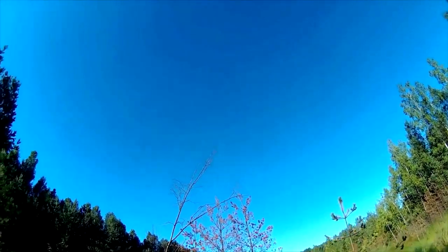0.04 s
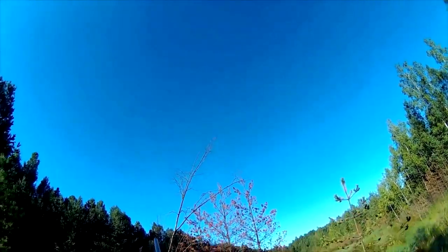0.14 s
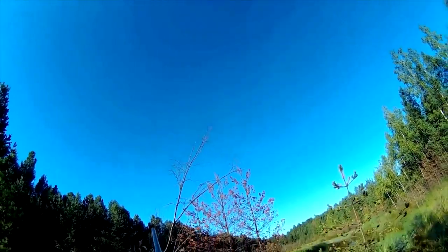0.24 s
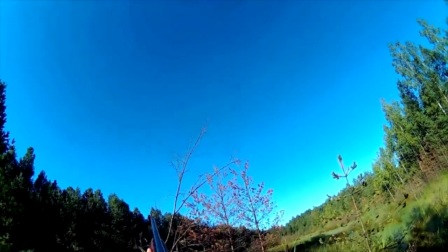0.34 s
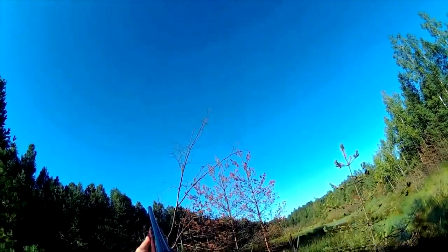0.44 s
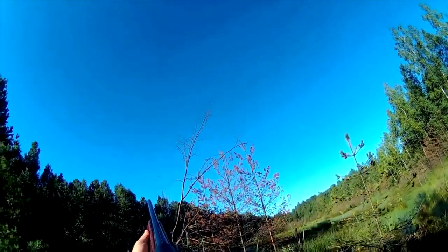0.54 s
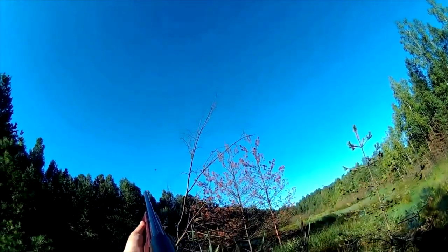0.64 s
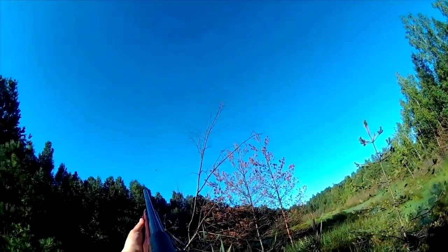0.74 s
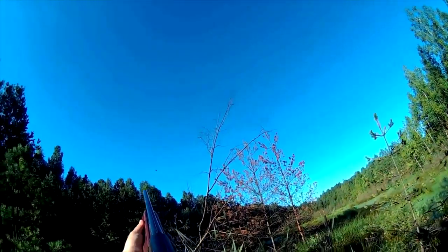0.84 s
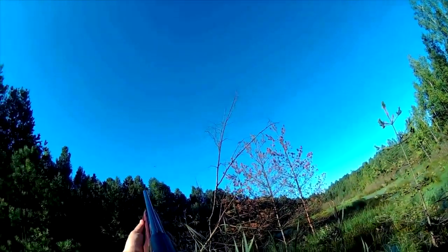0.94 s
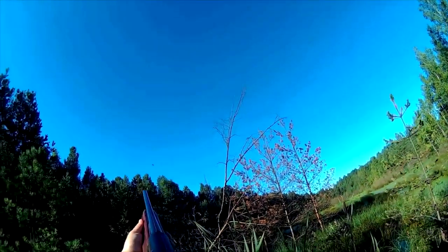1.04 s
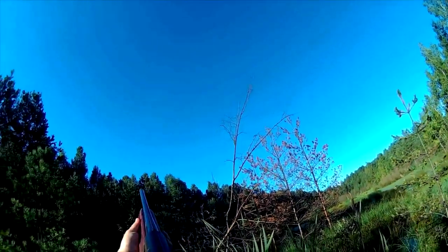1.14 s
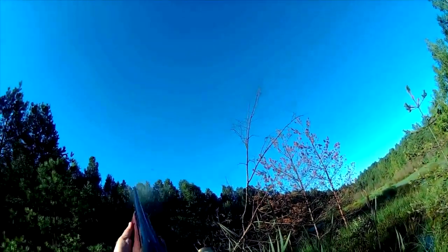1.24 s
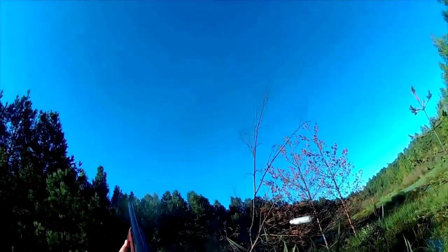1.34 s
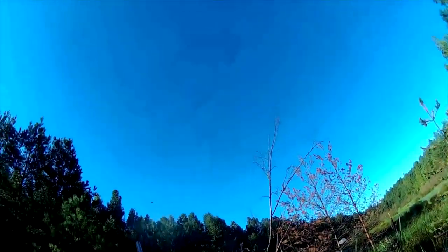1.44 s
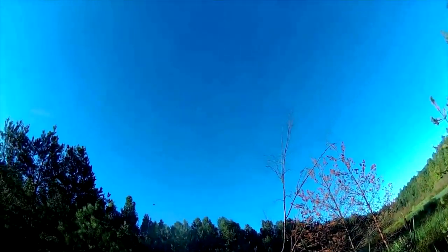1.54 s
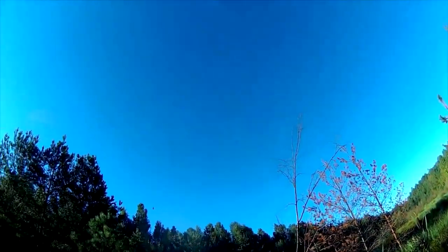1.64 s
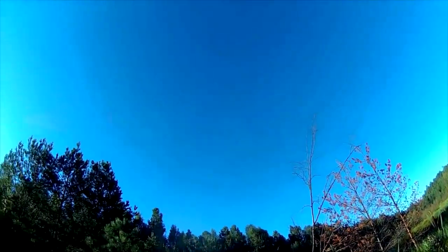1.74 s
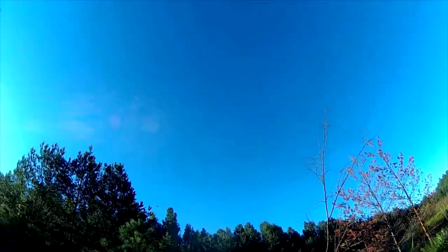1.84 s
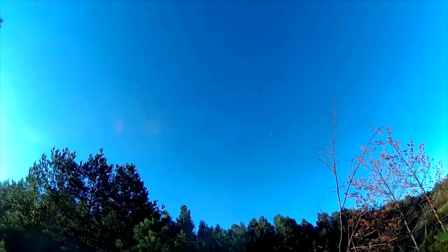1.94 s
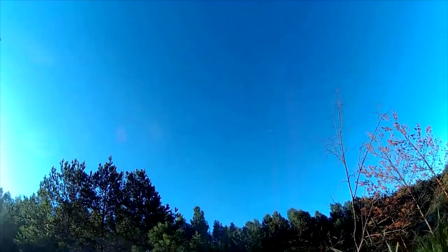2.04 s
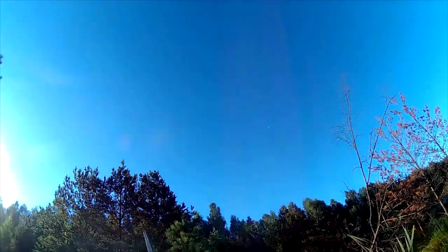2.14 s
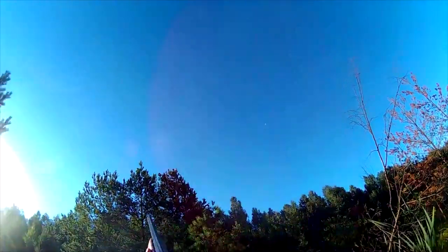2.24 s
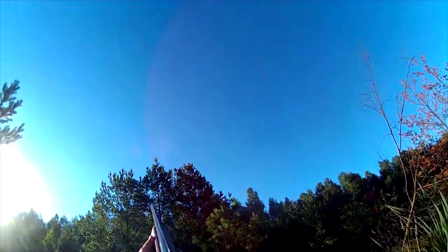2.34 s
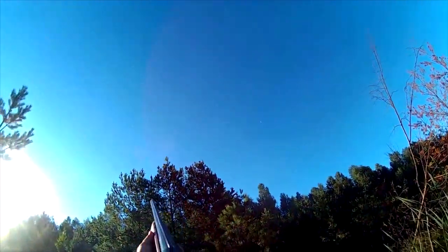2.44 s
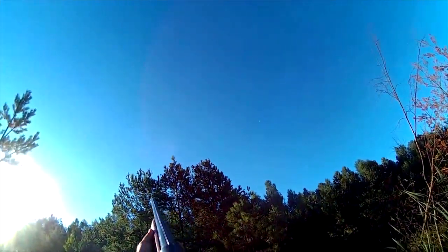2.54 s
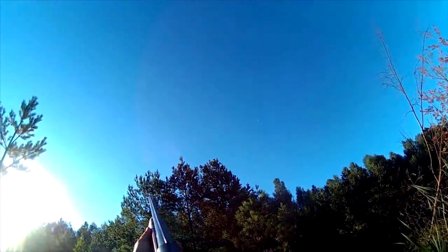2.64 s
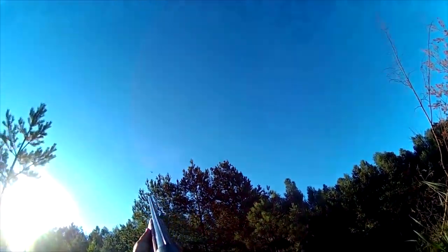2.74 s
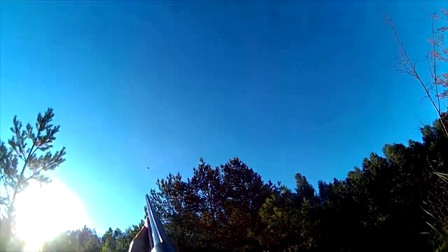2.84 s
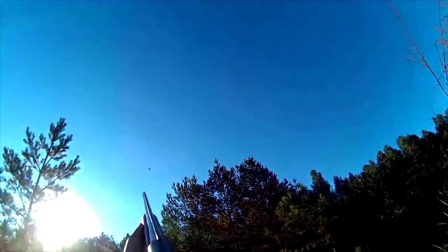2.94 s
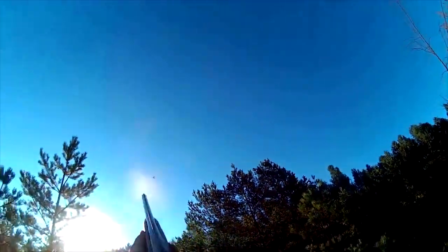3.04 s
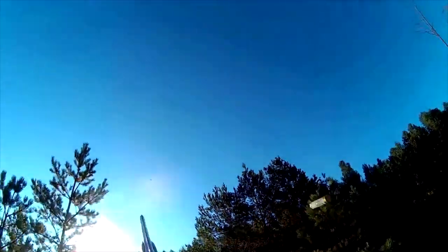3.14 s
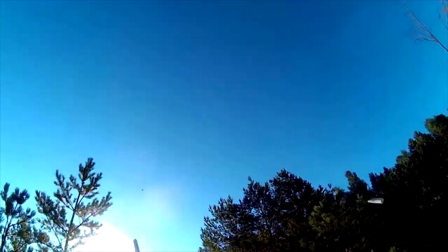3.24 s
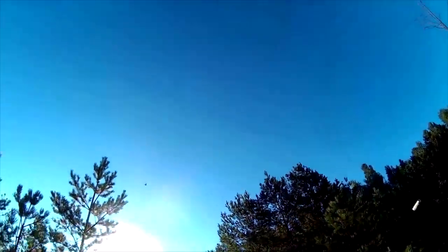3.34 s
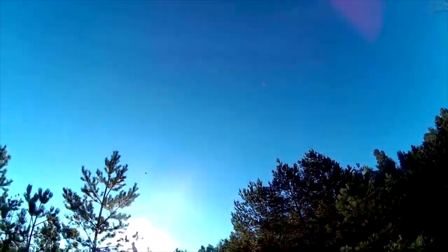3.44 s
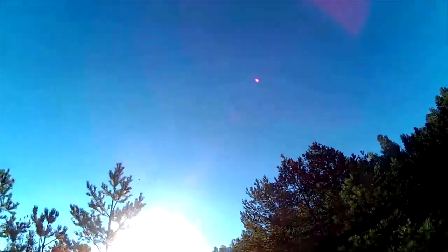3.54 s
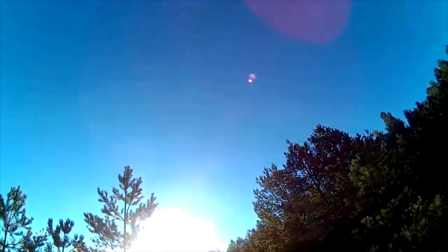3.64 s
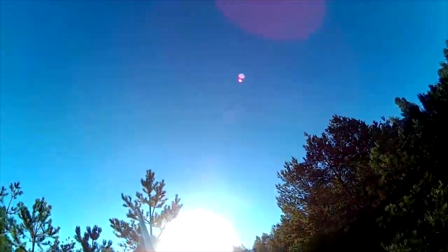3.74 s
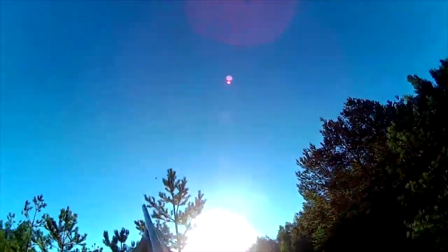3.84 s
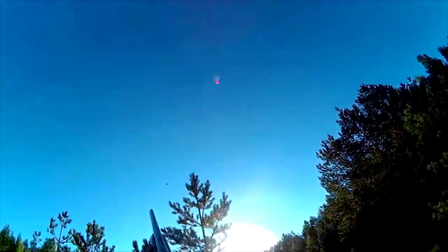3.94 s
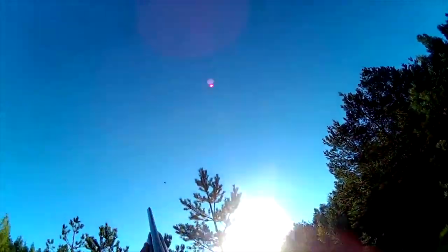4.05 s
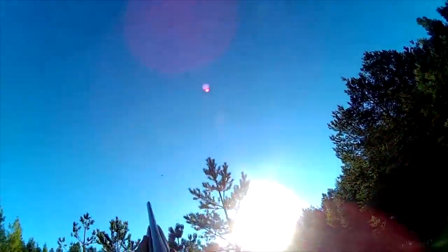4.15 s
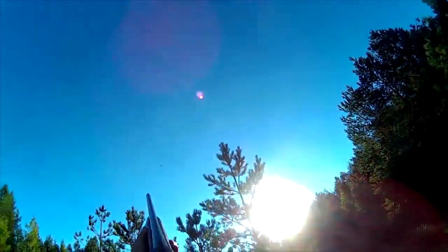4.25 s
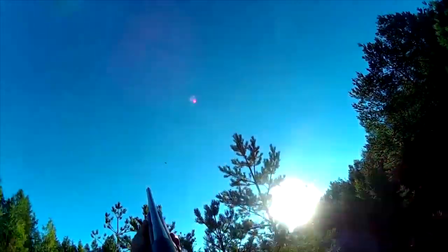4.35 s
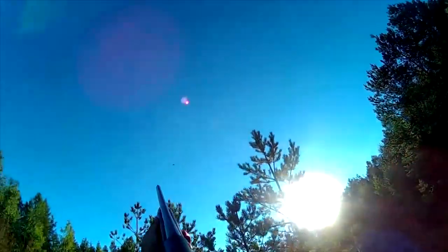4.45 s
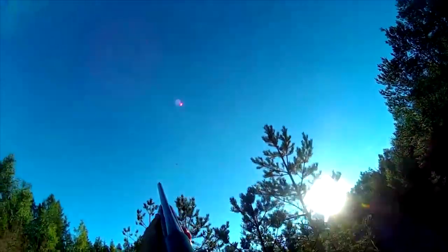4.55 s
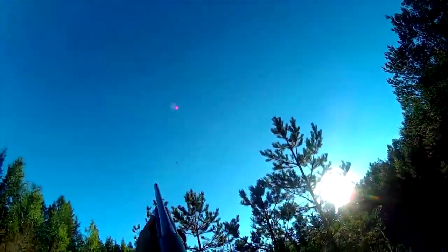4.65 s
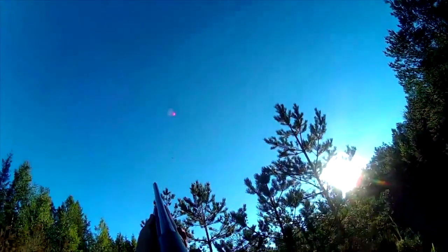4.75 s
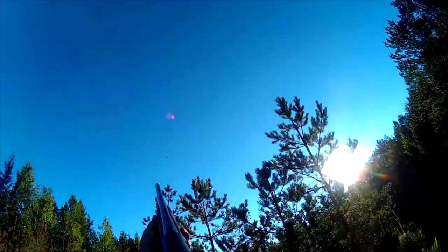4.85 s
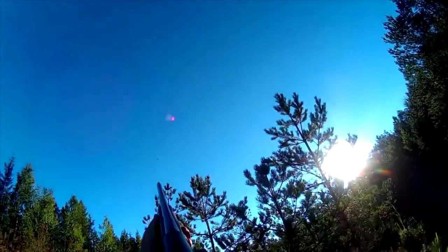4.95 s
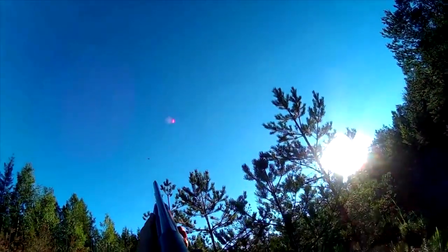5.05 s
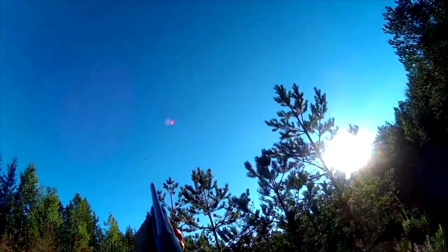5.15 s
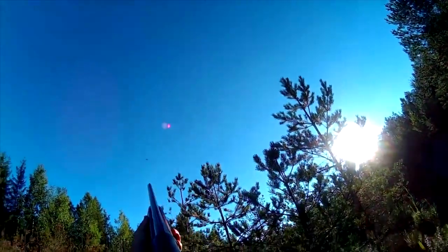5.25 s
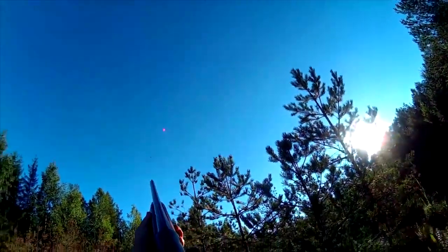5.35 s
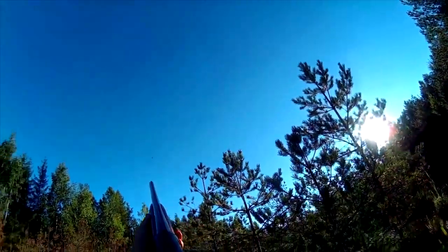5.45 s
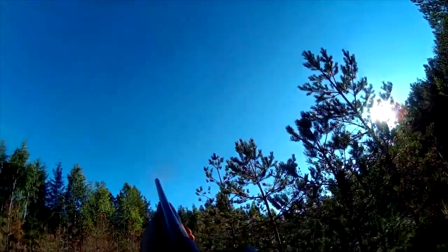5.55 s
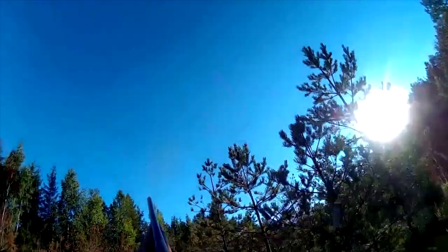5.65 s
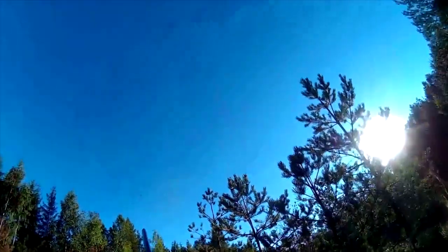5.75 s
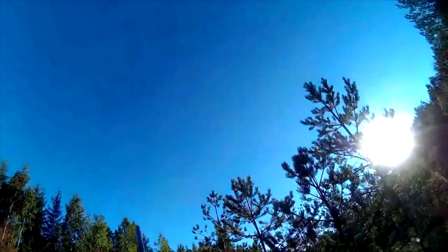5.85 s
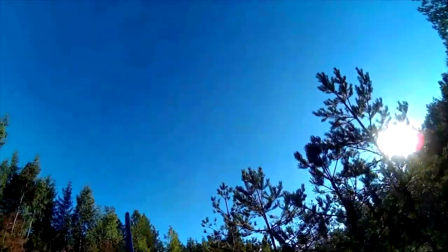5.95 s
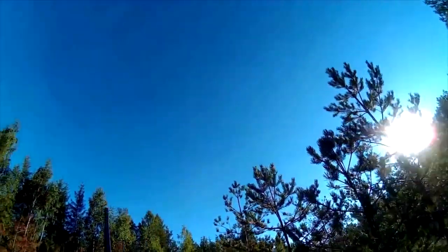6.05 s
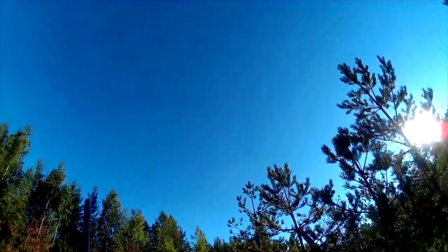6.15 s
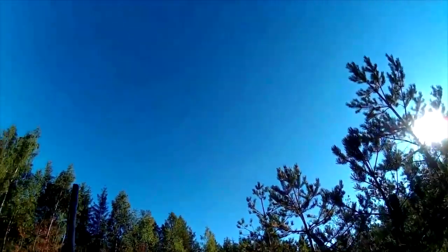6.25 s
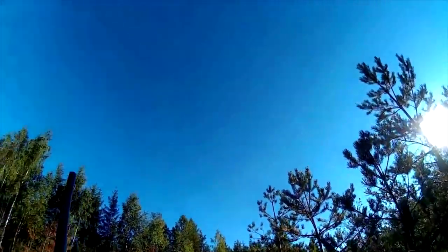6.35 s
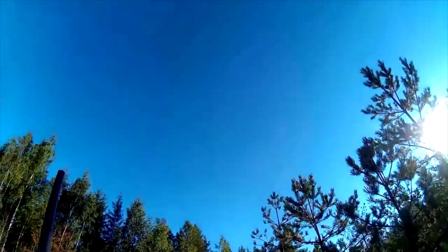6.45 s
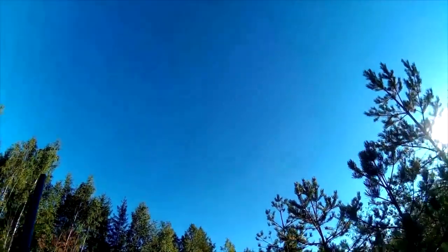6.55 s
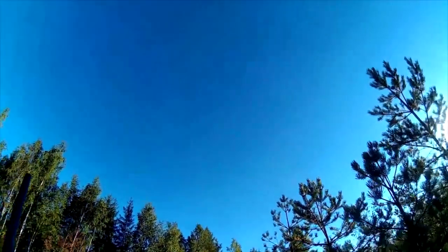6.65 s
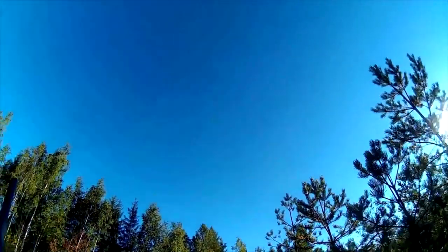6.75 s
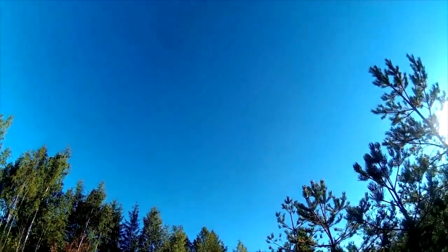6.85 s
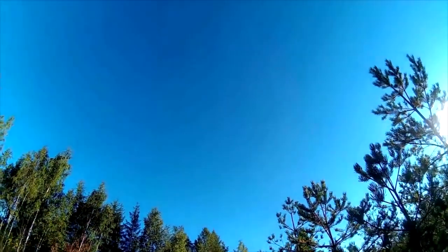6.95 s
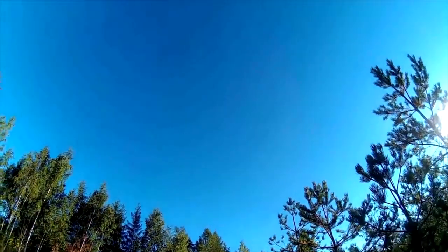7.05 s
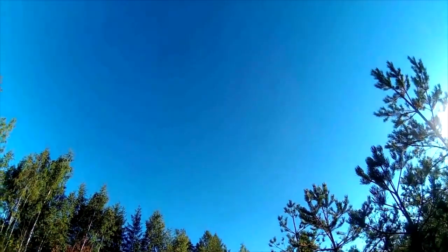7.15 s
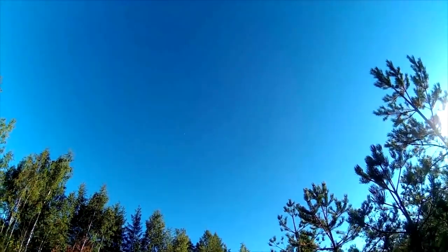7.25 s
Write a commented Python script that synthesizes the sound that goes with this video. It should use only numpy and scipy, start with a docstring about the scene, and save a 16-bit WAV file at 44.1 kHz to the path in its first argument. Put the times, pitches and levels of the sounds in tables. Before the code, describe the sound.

Close jacket rubbing and small gun knocks over faint still air, then three shotgun shots spaced a couple of seconds apart. A hard plastic crack opens each one; the roll crushes the cheap, dull body-worn microphone, seems to swell, then clears into long uneven forest echoes with a few stronger slaps. More cloth rustles before the third shot and after it, with a duller knock.

```python
"""A forest clearing: three shotgun shots, heard from a small camera worn by the shooter.
Noise split into bands makes each blast's long, darkening roll off the trees; short pulses are single strong echoes.
At first the roll overdrives the microphone, which folds over: it rasps and seems to swell, then fades cleanly.
Filtered noise and gliding tones make the sleeves rustle and zip; short ringing modes make the gun knock.
Each shot opens with the crack of the ringing camera case, and faint steady noise is the still air."""
import sys
import numpy as np
from scipy import signal
from scipy.fft import rfft, irfft, next_fast_len
from scipy.io import wavfile

SR = 44100
rng = np.random.default_rng(int(sys.argv[2]) if len(sys.argv) > 2 else 0)


def pcm_store(signal):
    """Save signal as 16-bit PCM."""
    levels = np.round(np.clip(np.atleast_2d(signal), -1, 1) * 32767)
    wavfile.write(sys.argv[1], SR, levels.astype(np.int16).T)


N = 322341
TIME = np.arange(N) / SR   # seconds

# The shots. Each row: start in seconds, roll level about one second later in dB before the microphone,
# its fall in dB per tenfold age, lull depth in dB, delay of the far trees in seconds,
# their swell in dB, strength of the shock on the camera case in dB.
SHOTS = [(1.5391, -18.5, 44.5, 8.5, .5, 2, -3.5), (3.348, -22, 44.5, 8.5, .42, 1, -1.5),
         (5.8785, -20, 43, 11.5, .42, 3, -4)]


def from_db(db):
    """Decibels to gain."""
    return 10 ** (np.asarray(db) / 20)


def rms_one(x):
    """Scale to rms 1."""
    return x / np.sqrt(np.mean(x ** 2) + 1e-20)


def at_hz(points, hz):
    """Read a spectrum in dB on a log-frequency axis."""
    point_hz, db = np.transpose(points)
    return np.interp(np.log(hz + 1), np.log(point_hz), db)


def drift(rate, size=N):
    """Random wander with spread about 1, heading for a new value rate times a second."""
    knots = rng.standard_normal(4000)
    return 1.2 * np.interp(np.arange(size) / SR * rate, np.arange(len(knots)), knots)


def coloured(x, spectrum):
    """Give a steady noise its spectrum; rms 1."""
    size = next_fast_len(N)
    hz = np.fft.rfftfreq(size, 1 / SR)
    shaped = rfft(x, size) * from_db(at_hz(spectrum, hz))
    return rms_one(irfft(shaped, size)[:N])


def ring(clicks, hz, t60):
    """A damped resonance: each unit click starts a sine of height 1 that falls 60 dB in t60 seconds."""
    radius = from_db(-60 / (t60 * SR))
    angle = 2 * np.pi * hz / SR
    feedback = [1, -2 * radius * np.cos(angle), radius * radius]
    return signal.lfilter([0, np.sin(angle)], feedback, clicks + 1e-18)


def swell(age, at_s, width_s):
    """A smooth bump of height 1."""
    return np.exp(-((age - at_s) / width_s) ** 2)


def still_air():
    """Still air over the clearing: a faint steady noise, weak in the treble."""
    # Each row: frequency in Hz, relative density in dB per Hz.
    air_colour = [(30, -10), (90, 1), (300, -0.5), (750, 1.5), (1100, -2.5), (1700, -13), (3000, -19),
                  (4200, -23.5), (6000, -22), (9000, -24.5)]
    level_db = -52.5
    return from_db(level_db) * coloured(rng.standard_normal(N), air_colour)


def jacket_levels():
    """Rubbing and hiss in dB: every arm movement swells and dies away over a faint resting rustle."""
    # Arm movements that slide the jacket. Each row: fastest moment in seconds, rise in seconds,
    # fall in seconds, dull rubbing in dB, hiss of the weave in dB.
    strokes = [(.46, 0.35, 0.44, -47.5, -57), (.575, 0.16, 0.14, -37.5, -49),
               (.64, 0.15, 0.53, -34.5, -41.5), (.815, 0.054, 0.15, -30.5, -38),
               (1.04, 0.17, 0.09, -48, -46), (1.22, .12, 0.082, -60, -57), (4.42, 0.59, .3, -42, -50),
               (4.68, 0.18, 0.4, -33.5, -36), (4.9, .2, 0.35, -50, -48.5), (5.31, .16, 0.14, -59, -48.5),
               (6.81, 0.076, 0.097, -28.5, -42), (6.97, .08, 0.096, -31.5, -46)]
    rest_rub_db, rest_hiss_db = -66, -72.5
    stroke_range_db = 20   # gained over the rise, lost over the fall
    rub, hiss = from_db(rest_rub_db), from_db(rest_hiss_db)
    for s, rise_s, fall_s, rub_db, hiss_db in strokes:
        distance = np.maximum((s - TIME) / rise_s, (TIME - s) / fall_s)
        stroke = from_db(-stroke_range_db * distance)
        rub = np.hypot(rub, stroke * from_db(rub_db))
        hiss = np.hypot(hiss, stroke * from_db(hiss_db))
    return 20 * np.log10(rub), 20 * np.log10(hiss)


def cloth(spectrum, snags_per_s, snag_db, flutter_db):
    """Sliding fabric: a smooth friction noise with tiny snags, gripping and slipping unevenly."""
    snags = (rng.random(N) < snags_per_s / SR) * rng.standard_normal(N)
    friction = rng.standard_normal(N) + from_db(snag_db) * rms_one(snags)
    return coloured(friction, spectrum) * from_db(flutter_db * drift(90))


def sleeves(rub_db, hiss_db):
    """The jacket rubs dully and its weave hisses as the gun is raised, swung and lowered."""
    # Dull rubbing. Each row: frequency in Hz, relative density in dB per Hz.
    rub_colour = [(80, -29.5), (200, -13), (500, 2), (1050, 6.5), (1700, 0), (2600, -4.5), (4000, -41.5)]
    # Hiss of the weave. Each row: frequency in Hz, relative density in dB per Hz.
    weave_colour = [(900, -6), (1700, 6), (2600, -1), (3900, 1.5), (4600, -11), (5800, -12), (7000, -23.5),
                    (9000, -15)]
    rub = from_db(rub_db) * cloth(rub_colour, snags_per_s=540, snag_db=-3.5, flutter_db=1.0)
    hiss = from_db(hiss_db) * cloth(weave_colour, snags_per_s=150, snag_db=-2.5, flutter_db=2.5)
    return rub + hiss


def zip_glide(size, from_hz, to_hz, rough):
    """Ribs of the weave slip past each other at an uneven, gliding rate; rms 1."""
    hz = np.geomspace(from_hz, to_hz, size) * (1 + rough * drift(900, size=size))
    tone = np.sin(2 * np.pi * np.cumsum(hz) / SR)
    return rms_one(np.hanning(size) * tone)


def zips(rub_db, rough, small_db, spread_db, small_hz, small_s, count):
    """Taut fabric zips over itself: a few placed rising zips, and many small ones that follow the rubbing."""
    # Each row: start in seconds, length in seconds, first pitch in Hz, last pitch in Hz, rms level in dB.
    placed_zips = [(.072, 0.014, 540, 1250, -44), (.555, 0.047, 900, 1190, -36),
                   (.698, 0.044, 441, 1200, -34.5), (1.093, 0.029, 450, 950, -46.5)]
    rows = list(placed_zips)
    for when, pitch, glide, force in rng.random((count, 4)):
        s = when * TIME[-1]
        from_hz = small_hz * 2 ** (2 * pitch - 1)      # up to an octave either way
        to_hz = from_hz * 2 ** (glide - .5)            # glides up or down, half an octave at most
        db = rub_db[int(s * SR)] + small_db + spread_db * (force - 1)
        rows.append((s, small_s, from_hz, to_hz, db))
    out = np.zeros(N + SR)
    for s, length, from_hz, to_hz, db in rows:
        start, size = int(s * SR), int(length * SR)
        out[start:start + size] += from_db(db) * zip_glide(size, from_hz, to_hz, rough)
    return out[:N]


def gun_knocks(level_db, scatter_db):
    """Each contact rings the modes near its own centre: soft ones the low modes, hard ones the high."""
    # Gun against hands and clothes. Each row: start in seconds, relative strength in dB,
    # centre in Hz, spread in octaves.
    knocks = [(.089, -12, 1270, 0.44), (0.1016, -24, 1400, .29), (.165, -26.5, 1550, 0.62),
              (0.2512, -9, 680, 0.9), (.267, -21, 1300, 0.54), (.244, -27, 900, 0.71),
              (.78, -12.5, 487, 0.69), (.794, -13, 503, 0.74), (0.816, -21, 1100, 1.1),
              (.941, -23, 1600, 1), (1.143, -18, 1465, .77), (4.436, -13.5, 1720, 0.42),
              (4.671, -11, 1710, 0.97), (4.858, -7.5, 1870, 0.9), (5.092, -38, 3630, 0.078),
              (5.27, -30, 1720, 0.81), (5.295, -22, 1680, 0.55), (6.884, -24, 200, 0.49),
              (6.928, -17, 300, .7), (6.95, -12, 387, 0.42), (6.971, -3.5, 437, 0.49)]
    # The lock before every shot, trigger then hammer. Each row: lead in seconds, relative strength in dB,
    # centre in Hz, spread in octaves.
    lock_contacts = [(0.021, -25, 2000, 0.89), (0.00393, -15.5, 1000, 2.2)]
    # What the gun rings with. Each row: frequency in Hz, relative level in dB, 60 dB decay in seconds.
    gun_modes = [(170, 0, 0.036), (285, -2, 0.033), (450, 0.5, 0.017), (680, 4.5, 0.011), (930, 3.5, 0.013),
                 (1206, 2.5, 0.017), (1470, -4, 0.029), (1770, -6, 0.021), (2600, -8, 0.007),
                 (3630, -17.5, 0.042), (4270, -4, 0.011), (5580, -16, .006)]
    lock = [(shot[0] - lead, *contact) for shot in SHOTS for lead, *contact in lock_contacts]
    s, db, centre, spread = np.transpose(knocks + lock)
    hz, mode_db, t60 = np.transpose(gun_modes)
    octaves_away = np.log2(hz / centre[:, None])
    weights = np.exp(-.5 * (octaves_away / spread[:, None]) ** 2)
    weights = weights * from_db(mode_db + scatter_db * rng.standard_normal(weights.shape))
    weights = weights / np.linalg.norm(weights, axis=1, keepdims=True)
    out = np.zeros(N)
    for k in range(len(hz)):
        clicks = np.zeros(N)
        clicks[(s * SR).astype(int)] = from_db(db + level_db) * weights[:, k]
        out += (-1) ** k * ring(clicks, hz[k], t60[k])   # neighbouring modes start in opposite directions
    return out


def case_jolts(t60):
    """The shock front briefly rings two modes of the camera case: the crack that opens each shot."""
    case_hz = 2290
    shocks = sum(from_db(db) * signal.unit_impulse(N, int(s * SR)) for s, *_, db in SHOTS)
    return .75 * ring(shocks, case_hz, t60) + .45 * ring(shocks, 1.4 * case_hz, t60)


def roll_level(age, late_db, fall_db, lull_db, far_s, far_db):
    """Level in dB: the blast, a short hold, then a power-law fall, marked by the lie of the land."""
    blast_db, blast_s = 9, 0.017     # the direct blast stands above the roll and dies this fast
    clearing_s = .13                 # echoes from inside the clearing hold the level about this long
    spreading = late_db - fall_db * np.log10(np.hypot(age, clearing_s))
    # open ground sends little back, then the forest edge answers
    lull = lull_db * swell(age, at_s=0.088, width_s=0.023)
    edge = 3 * swell(age, at_s=0.119, width_s=0.011)
    # later the far trees, wherever the gun points, answer in a broad swell
    far_trees = far_db * swell(age, far_s, width_s=0.06)
    return blast_db * np.exp(-age / blast_s) + spreading - lull + edge + far_trees


def forest_roll(shot, clump_db, patch_db, surge_db):
    """Countless echoes from trunks and crowns: noise that comes in clumps and darkens as the paths grow longer."""
    # Colour of the roll before the tilts below. Each row: frequency in Hz, relative density in dB per Hz.
    roll_colour = [(40, -47.5), (90, -30), (150, -27), (230, -16.5), (400, -9), (650, -1.5), (950, 1.5),
                   (1400, -5.5), (2000, -11.5), (2900, -24.5), (4000, -32), (5500, -38.5), (7000, -72)]
    colour_age_s = 0.6                   # age at which the air leaves this colour untouched
    air_db_per_s_khz = 4.5               # the air takes the treble from longer paths
    near_tilt_db, near_s = -0.5, 0.12    # early tilt in dB per octave, and its decay time
    early_clump_db, early_s = 2, .28     # the first echoes are few and uneven
    s, *shape, _ = shot
    start = int(s * SR)
    age = TIME[:N - start]
    size = next_fast_len(len(age))
    hz = np.fft.rfftfreq(size, 1 / SR)
    noise = rfft(rng.standard_normal(size)) * from_db(at_hz(roll_colour, hz))
    echoes = rfft(rms_one(irfft(noise, size)))
    centres = np.geomspace(60, 7680, 11)
    out = 0
    # overlapping bands that add up to the whole, each with its own patchiness
    for centre, own in zip(centres, np.eye(len(centres))):
        share = np.interp(np.log(hz + 1), np.log(centres), own)
        band = irfft(echoes * share, size)[:len(age)]
        absorbed_db = air_db_per_s_khz * (centre - 900) / 1000 * (age - colour_age_s)
        near_db = near_tilt_db * np.log2(centre / 900) * np.exp(-age / near_s)
        patches_db = patch_db * drift(24.75, size=len(age))
        out = out + band * from_db(near_db - absorbed_db + patches_db)
    level_db = roll_level(age, *shape) + surge_db * drift(18, size=len(age))
    ragged_db = clump_db + early_clump_db * swell(age, 0, early_s)
    clumps_db = ragged_db * drift(110, size=len(age))
    return np.pad(out * from_db(level_db + clumps_db), (start, 0))


def slaps(hz, t60):
    """A flat face of the forest edge sends the blast back as one short, dull pulse."""
    # Single strong echoes that stand out of the roll. Each row: start in seconds,
    # strength in dB before the microphone.
    strong_echoes = [(2.0535, 22), (2.0825, 3), (2.1485, 7), (3.8295, 11.5), (3.8815, 4), (6.4135, 4),
                     (6.4345, 2.5), (6.4885, 11.5)]
    s, db = np.transpose(strong_echoes)
    clicks = np.zeros(N)
    clicks[(s * SR).astype(int)] = from_db(db)
    return ring(clicks, hz, t60)


def scene():
    """Still air, gun handling and rolling shots, as they reach the microphone."""
    air = still_air()
    rub_db, hiss_db = jacket_levels()
    rustle = sleeves(rub_db, hiss_db)
    squeaks = zips(rub_db, rough=0.11, small_db=1.5, spread_db=13.0, small_hz=838, small_s=.02, count=380)
    knocking = gun_knocks(level_db=-1.5, scatter_db=1.0)
    rolls = sum(forest_roll(shot, clump_db=0.5, patch_db=-0.65, surge_db=1.08) for shot in SHOTS)
    shots = rolls + slaps(hz=900, t60=0.0079)
    return (shots + knocking + rustle + squeaks + air)[None]


def round_off(x, ceiling, order):
    """Peaks bend smoothly under the ceiling; the higher the order, the harder the knee."""
    return x / (1 + np.abs(x / ceiling) ** order) ** (1 / order)


def fold_over(x, ceiling, limit, shelf, width):
    """An overdriven input stage: peaks round off at the ceiling; past the limit they collapse to a low shelf."""
    fine = signal.resample_poly(x, 2, 1, axis=-1)   # bent at twice the rate to limit aliasing
    size = np.abs(fine)
    holding = np.exp(-(np.maximum(size - limit, 0) / width) ** 2)
    bent = np.sign(fine) * (shelf + (round_off(size, ceiling, order=6) - shelf) * holding)
    return x + signal.resample_poly(bent - fine, 1, 2, axis=-1)


def low_pass(x, hz):
    """A very steep top cut."""
    return signal.sosfilt(signal.ellip(10, .3, 70, hz, fs=SR, output="sos"), x)


def low_rate(x, order):
    """Only one sample in a few is kept, so the treble is mirrored upwards about half the lowered rate."""
    kept = np.arange(N) % order == 0
    return low_pass(x, .96 * SR / order / 2) * kept * order


def record(dry):
    """The microphone folds over, the case adds its crack, and a low-rate recorder dulls, mirrors and cuts the top."""
    folded = fold_over(dry, ceiling=0.76, limit=0.83, shelf=0.18, width=0.32)
    raw = folded + case_jolts(t60=0.0086)
    dull_hz, low_cut_hz, mirror_hz = 4698.0, 52.0, 6401.0
    cutoff_hz, fizz_top_hz, leak_db = 8830, 12900, -40.5
    x = signal.sosfilt(signal.butter(3, dull_hz, fs=SR, output="sos"), raw)
    x = signal.sosfilt(signal.butter(1, low_cut_hz, "high", fs=SR, output="sos"), x)
    x = signal.sosfilt(signal.butter(2, mirror_hz, fs=SR, output="sos"), low_rate(x, order=3))
    # a trace of the overload's fizz gets past the band limit
    x = low_pass(x, cutoff_hz) + from_db(leak_db) * raw
    return low_pass(round_off(x, ceiling=.92, order=16), fizz_top_hz)


dry = scene()
out = record(dry)
pcm_store(out)
```